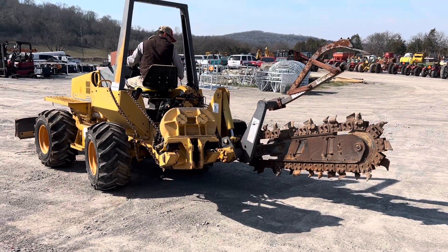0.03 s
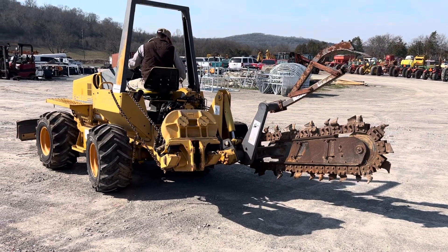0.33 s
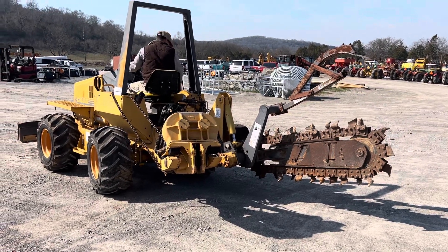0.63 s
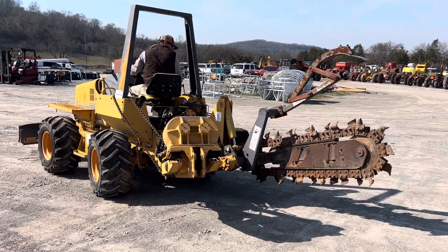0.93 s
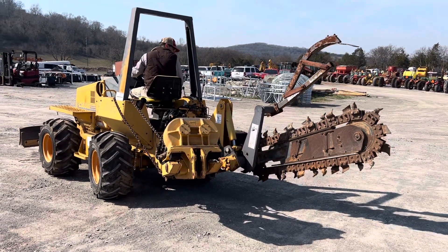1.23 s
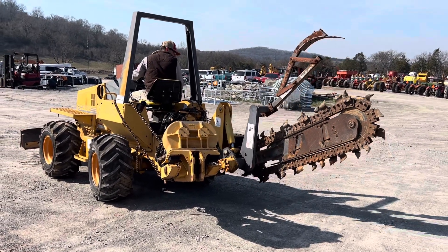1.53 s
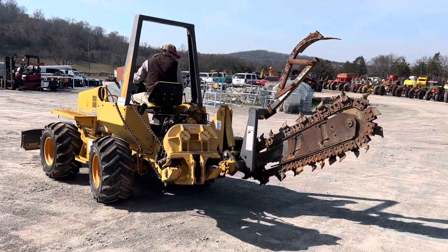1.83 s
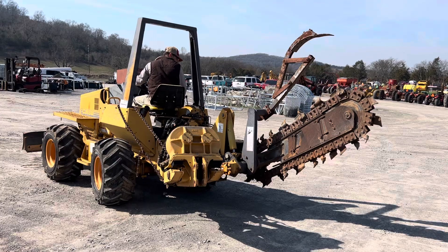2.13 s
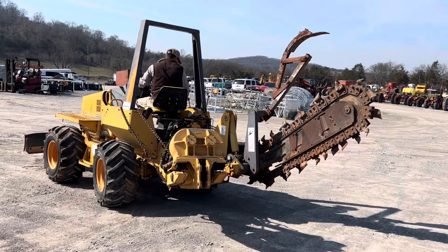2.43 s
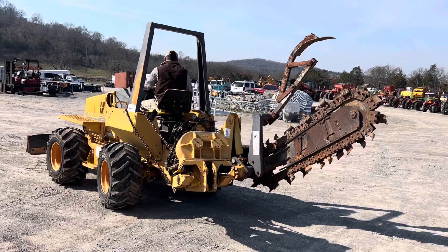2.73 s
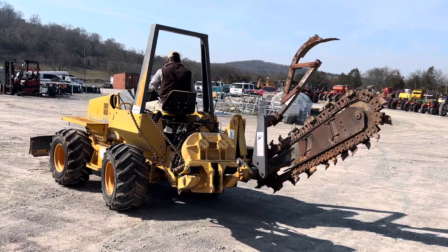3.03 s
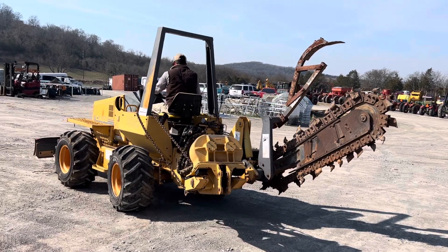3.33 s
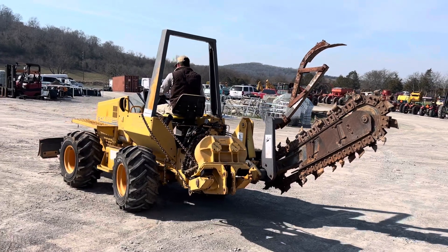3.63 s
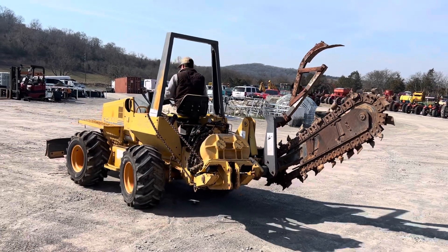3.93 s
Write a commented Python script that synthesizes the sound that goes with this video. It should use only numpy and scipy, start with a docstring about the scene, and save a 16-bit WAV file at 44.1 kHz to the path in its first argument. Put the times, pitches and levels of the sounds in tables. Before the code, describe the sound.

A trencher's diesel engine drones low and steady throughout, with a fast mechanical clatter, in an open gravel yard. The slack digging chain gives four short metallic clinks between about 1.8 and 3 seconds. From around 3 seconds the lifting boom groans softly and a hydraulic whine builds, peaking near 3.6 seconds, as the engine drops slightly in pitch and sounds harder under load.

```python
"""A fast, steady exhaust drone and the clatter of a four-cylinder diesel: a trencher in an open gravel yard.
Periodic combustion forces the block and panels, so their pattern repeats every cycle of four firings;
an order is a multiple of that cycle's rate. As the digging boom lifts, the slack chain clinks by impact.
Near the end the hydraulic pump takes load: it whines, the boom groans, and the engine sags and hardens."""
import sys
import numpy as np
from scipy import signal
from scipy.fft import rfft, irfft
from scipy.io import wavfile

SR = 44100
rng = np.random.default_rng(int(sys.argv[2]) if len(sys.argv) > 2 else 0)


def int16_out(signal):
    """Quantize to a 16-bit WAV file."""
    q = np.round(np.clip(np.atleast_2d(signal).T, -1, 1) * 32767)
    wavfile.write(sys.argv[1], SR, q.astype(np.int16))


N = 176400
TIME = np.arange(N) / SR
FREQ = np.maximum(np.arange(N // 2 + 1) * SR / N, 1)


def undb(db):
    """Amplitude ratio of a level in decibels."""
    return 10 ** (np.asarray(db) / 20)

def unit(x):
    """Normalisation to rms 1."""
    return x / np.sqrt(np.mean(x ** 2))

def curve(rows):
    """Linear interpolation of (t/s, value) rows."""
    return np.interp(TIME, *np.array(rows).T)

def across(rows):
    """Interpolation of (f/Hz, value) rows on a logarithmic frequency axis."""
    hz, value = np.array(rows).T
    return np.interp(np.log(FREQ), np.log(hz), value)

def colour(x, *tables):
    """Zero-phase filters in cascade: the gains of their (f/Hz, gain/dB) tables add."""
    return irfft(rfft(x) * undb(sum(across(rows) for rows in tables)), N)

def ring(x, hz, width_hz):
    """Forced response of a damped resonator, with gain 1 at resonance."""
    return irfft(rfft(x) / (1 + 1j * (FREQ / hz - hz / FREQ) * hz / width_hz), N)

def noise():
    """White Gaussian noise."""
    return rng.standard_normal(N)

def walk(rate_hz):
    """Slow random fluctuation: low-passed noise of rms 1."""
    return unit(irfft(rfft(noise()) / (1 + (FREQ / rate_hz) ** 4), N))

def tone(turns):
    """Sinusoid of rms 1 and random initial phase."""
    return np.sqrt(2) * np.sin(2 * np.pi * (turns + rng.random()))

def repeating(cycle, size=2744):
    """Periodic noise: one flat-spectrum waveform recurs in every engine cycle."""
    period = irfft(np.exp(2j * np.pi * rng.random(size // 2 + 1)), 4 * size)
    return unit(np.interp(cycle % 1, np.linspace(0, 1, len(period), endpoint=False), period))

def burst(turns, decay):
    """A sudden onset once a turn, then exponential decay with a time constant in turns."""
    return np.exp(-(turns % 1) / decay)

def swell(at, width):
    """Gaussian pulse in time, down to 1/e at one width from its centre."""
    return np.exp(-((TIME - at) / width) ** 2)


# Harmonics of exhaust and body: order, rms level/dB
EXHAUST_HARMONICS = [(4, -10.5), (5, -36.5), (6, -55), (7, -38.5), (8, -27), (9, -45.5), (11, -46.5),
                     (12, -37), (13, -33), (14, -37), (15, -47.5), (16, -40), (18, -40), (22, -45.5),
                     (24, -36.5), (32, -46.5), (33, -41.5), (35, -45.5), (36, -43.5)]
# Brief dips of the firing tone and its octave: t/s, gain/dB, width/s
DRONE_DIPS = [(.53, -0.5, 0.012), (1.78, -2.5, 0.013), (1.88, -3, 0.0069), (2.495, -7.5, 0.0062)]
# Spectrum of the low rumble: f/Hz, relative level/dB
RUMBLE_SPECTRUM = [(20, -36), (40, -2), (60, -25), (90, 9.5), (120, -6), (160, 4.5), (220, 3), (300, -37),
                   (500, -25)]

def exhaust(cycle):
    """Periodic gas pulses radiate a harmonic series, joined by the fan's blade tone and a low rumble."""
    fan_order, fan_db, rumble_db = 15.5, -36, -36.5
    dip_db = sum(db * swell(at, width) for at, db, width in DRONE_DIPS)
    drone = 0
    for order, db in EXHAUST_HARMONICS:
        if order in (4, 8):  # firing tone and octave, locked in phase for a sharp trough
            locked = -np.sqrt(2) * np.cos(2 * np.pi * order * cycle)
            drone += undb(db + 0.3 * walk(6.6) + dip_db) * locked
        else:
            drone += undb(db + walk(3.8)) * tone(order * cycle)
    fan = undb(fan_db + 2.5 * walk(4)) * tone(fan_order * cycle + .12 * walk(3))
    rumble = undb(rumble_db) * unit(colour(noise(), RUMBLE_SPECTRUM))
    soft_ends = np.minimum(1, np.minimum(TIME, TIME[-1] - TIME) / .004)
    return soft_ends * (drone + fan + rumble)


# Frequency response of the engine block: f/Hz, gain/dB
BLOCK_RESPONSE = [(150, -5.5), (240, -7.5), (320, 2), (385, 0), (450, 1.5), (550, -3), (650, -2.5),
                  (780, -4.5), (880, -1.5), (980, 2), (1150, -3), (1300, 1.5), (1500, -2), (1650, -5.5),
                  (1850, -8), (2020, -11), (2150, -15), (2600, -16), (2900, -17), (3350, -15.5),
                  (4000, -24.5), (5500, -27), (6600, -27), (10000, -46), (15000, -46)]
# Weighting of the clatter that repeats each cycle: f/Hz, gain/dB
PERIODIC_WEIGHT = [(150, -24), (400, -4), (560, -9), (780, -3), (1000, -5.5), (1300, -3), (2000, 1),
                   (3500, 1.5), (6000, -10), (15000, -4)]
# Weighting of the rattle that is new each cycle: f/Hz, gain/dB
RANDOM_WEIGHT = [(150, 3), (300, 0.5), (600, -5.5), (1000, -8.5), (2000, -6), (3500, -3.5), (6000, 0.5),
                 (15000, 8)]
# Spectral rise at full load: f/Hz, multiple of hardening_db
HARDENING_SHAPE = [(200, 0.3), (350, 0.3), (540, 0.14), (750, 1.4), (1000, .9), (1500, .95), (2000, .6),
                   (2500, 1.35), (4000, 0.24), (12000, 1.22)]

def block(cycle, load):
    """Forced vibration: each firing shakes the block, and load hardens the middle and upper range."""
    clatter_db, rattle_db, hardening_db = -33.5, -33, 5
    force = 1 + 0.74 * burst(4 * cycle, decay=0.9) * undb(2 * walk(30))
    clatter = undb(clatter_db) * unit(colour(repeating(cycle) * force, BLOCK_RESPONSE, PERIODIC_WEIGHT))
    rattle = undb(rattle_db) * unit(colour(noise() * force, BLOCK_RESPONSE, RANDOM_WEIGHT))
    unloaded = clatter + rattle
    loaded = colour(unloaded, [(hz, hardening_db * share) for hz, share in HARDENING_SHAPE])
    return unloaded + load * (loaded - unloaded)


# Knock of each cylinder in firing order: relative level/dB
CYLINDER_LEVELS = [0, -9, -11, -14]

def knock(cycle):
    """Impulse excitation: every firing strikes a resonance of the block, one cylinder hardest."""
    hz, width_hz, level_db = 965, 130, -38
    firings = 4 * (cycle - .795)  # the hardest blow falls late in the cycle
    strength = undb(CYLINDER_LEVELS)[np.floor(firings).astype(int) % 4]
    blows = burst(firings, decay=.014) * strength * undb(walk(23))
    return undb(level_db) * unit(ring(ring(blows, hz, width_hz), hz, 2 * width_hz))


# Modes of covers and panels: f/Hz, bandwidth/Hz, rms level/dB, change at full load/dB
PANEL_MODES = [(1483, 27, -52, 6), (1782, 26, -52, 5), (1920, 37, -47, -4), (2470, 20, -52, 7),
               (2603, 24, -49, 3.5), (2920, 130, -54, -2), (3315, 150, -48, 2), (3540, 45, -59, -3),
               (3604, 76, -60.5, 4), (4760, 56, -58, 0), (6450, 50, -58, -3), (7020, 130, -59.5, -3),
               (8260, 360, -56.5, 3)]

def panels(cycle, load):
    """Resonance: broadband shaking, mostly periodic, drives narrow modes whose levels shift with load."""
    shake = repeating(cycle) + undb(-6) * noise()
    return sum(undb(db + load_db * load + 2 * walk(8.9)) * unit(ring(shake, hz, width_hz))
               for hz, width_hz, db, load_db in PANEL_MODES)


# Spectral lines of the timing gears and block: order, rms level/dB
TIMING_LINES = [(46, -46), (50, -42.5), (52, -46), (54, -53), (60, -45.5), (67, -45.5), (78, -43.5),
                (92, -47.5), (94, -43.5), (95, -46.5), (101, -53), (103, -48.5), (109, -52.5), (117, -54.5),
                (121, -52.5), (146, -53.5), (162, -55.5), (199, -56), (207, -51)]

def valve_gear(cycle, load):
    """Valve impacts give uneven high ticks twice a cycle; meshing timing gears give a line spectrum."""
    tick_hz, width_hz, tick_db = 12300, 25000, -50
    strength = undb(8.2 * np.tanh(walk(34)) + 3.7 * load)
    taps = strength * burst(2 * cycle - 0.14, decay=0.28) * noise()
    ticks = unit(ring(ring(taps, tick_hz, width_hz), tick_hz, 2 * width_hz))
    buzz = sum(undb(db - 0.2 * walk(4.5)) * tone(order * cycle) for order, db in TIMING_LINES)
    return undb(tick_db) * ticks + buzz


# Scattered sound relative to the block's response: f/Hz, gain/dB
YARD_SCATTERING = [(200, -9), (600, -2), (2000, -2), (4000, 5), (7000, 8), (12000, 7)]

def yard(level_db=-41):
    """Diffuse field: scattering by gravel and parked equipment, as independent noise in each channel."""
    wash = [unit(colour(noise(), BLOCK_RESPONSE, YARD_SCATTERING)) for _ in range(2)]
    return undb(level_db) * np.array(wash)


# Pump pressure, peaking as the engine starts to sag: t/s, fraction of full pressure
PUMP_PRESSURE = [(0, 0), (2.5, .3), (3.1, .62), (3.45, .95), (3.62, 1), (3.76, .76), (4, .7)]
# Pump whine: harmonic number, rms level at full pressure/dB, rise from zero pressure/dB
PUMP_HARMONICS = [(3, -42, 24), (5, -43, 28), (6, -42.5, 24), (7, -47, 10), (8, -41.5, 3), (9, -42, 12),
                  (10, -48, 20), (11, -44, 26), (12, -49, 18), (14, -51, 20)]

def hydraulics(cycle, firing_hz, load):
    """Gear whine grows with load, pump whine with pressure; pipe resonance lifts a harmonic nearing it."""
    gear_order, gear_db, pump_order = 48, -33, 14
    pipe_hz, pipe_width_hz, pipe_peak_db = 1920, 66, 13.5
    whine = undb(gear_db + 1.2 * walk(8.3)) * load ** 1.15 * tone(gear_order * cycle)
    pressure = curve(PUMP_PRESSURE)
    for harmonic, db, rise_db in PUMP_HARMONICS:
        order = harmonic * pump_order
        hz = order * firing_hz / 4
        pipe_db = pipe_peak_db / (1 + (2 * (hz - pipe_hz) / pipe_width_hz) ** 2)
        level_db = db + pipe_db + rise_db * (pressure - 1) + 0.55 * walk(14)
        whine += undb(level_db) * tone(order * cycle)
    return whine


# Impacts of the chain: t/s, peak level/dB, contact decay time/s, treble gain/dB
CHAIN_IMPACTS = [(1.7838, -26, .012, 0), (1.9525, -17.5, .004, -1), (2.592, -26.5, .006, -6),
                 (2.9667, -19.5, .007, 2)]
# Modes of a chain link: f/Hz, relative level/dB, T60/s
LINK_MODES = [(3720, 5.5, 0.017), (4620, -5, 0.034), (5680, -4.5, 0.025), (6420, -5, 0.047),
              (8200, -4.5, 0.037)]

def chain():
    """Damped free vibration: slack links drop against the rising boom, crack and ring briefly."""
    clinks = 0
    for at, db, decay, treble_db in CHAIN_IMPACTS:
        contact = (TIME >= at) * np.exp(-np.abs(TIME - at) / decay) * noise()
        modes = sum(undb(mode_db) * unit(ring(contact, hz, width_hz=np.log(1000) / np.pi / t60))
                    for hz, mode_db, t60 in LINK_MODES)
        crack = undb(-3) * unit(ring(ring(contact, 5300, 5000), 5300, 5000))
        clink = colour(modes + crack, [(3800, 0.0077), (5500, treble_db)])
        clinks += undb(db) * clink / np.abs(clink).max()
    return clinks


# Groans of the boom: t/s, width/s, order, rms level at the crest/dB
BOOM_GROANS = [(3.02, .17, 14, -26.5), (3.26, .1, 20, -33), (3.3, .18, 12, -35), (3.5, .14, 14, -32),
               (3.88, .16, 15, -35)]

def groans(cycle):
    """Amplitude modulation: in each groan of the straining boom, one low engine order swells and fades."""
    return sum(undb(db) * swell(at, width) * tone(order * cycle) for at, width, order, db in BOOM_GROANS)


# Phase lead of the left microphone port over the right: f/Hz, phase/rad
LEFT_LEAD = [(60, .1), (300, .2), (530, .8), (690, .2), (1100, 1.3), (1320, 2), (1480, 4.1), (1620, 4.8),
             (1750, 6.4), (2300, 6.2), (2600, 7), (3400, 7.3), (4500, 6.3), (5700, 4.8), (6600, 6.2),
             (7700, 6.1), (9500, 3.2), (11000, 2.8), (12000, .4), (13500, -.1), (15000, -2.8)]
# Excess level at the left port: f/Hz, level/dB
LEFT_EXCESS = [(60, -.6), (130, -1.5), (380, -3.5), (600, 3), (800, -1), (1080, 5), (1430, -10), (1800, 3),
               (2200, 1.5), (4400, 1.5), (12000, -0.5)]

def ports(x):
    """Two-point reception: the microphone ports differ in phase and level, at constant total power."""
    left = undb(across(LEFT_EXCESS) / 2) * np.exp(.5j * across(LEFT_LEAD))
    pair = np.array([left, 1 / left])
    pair /= np.sqrt(np.mean(np.abs(pair) ** 2, axis=0))
    return irfft(rfft(x) * pair, N)


# Firing rate of the engine: t/s, f/Hz
FIRING_RATE = [(0, 64.21), (.6, 64.36), (2.1, 64.37), (2.9, 64.26), (3.4, 64.03), (3.55, 63.55),
               (3.7, 61.6), (3.79, 60.9), (3.88, 61.2), (4, 62.1)]
# Hydraulic load: t/s, fraction of full load
HYDRAULIC_LOAD = [(0, 0.25), (.9, 0), (1.4, 0.12), (2.7, 0.39), (3.05, 0.52), (3.5, 0.62), (3.78, 0.95),
                  (4, 0.73)]

def scene():
    """Synchronous excitation: one crankshaft sets the phase of exhaust, block, valves and pump."""
    firing_hz = curve(FIRING_RATE) * (1 + 0.000522 * walk(5.57))
    load = curve(HYDRAULIC_LOAD)
    cycle = np.cumsum(firing_hz) / SR / 4  # four firings to a cycle
    engine = exhaust(cycle) + block(cycle, load) + knock(cycle)
    engine += panels(cycle, load) + valve_gear(cycle, load)
    return ports(engine + hydraulics(cycle, firing_hz, load) + chain()) + yard()

def record(dry, cutoff_hz=15500):
    """Band limiting: an elliptic low-pass filter removes the highest treble."""
    return signal.sosfilt(signal.ellip(8, .2, 70, cutoff_hz, fs=SR, output="sos"), dry)


dry = scene()
out = record(dry)
int16_out(out)
```